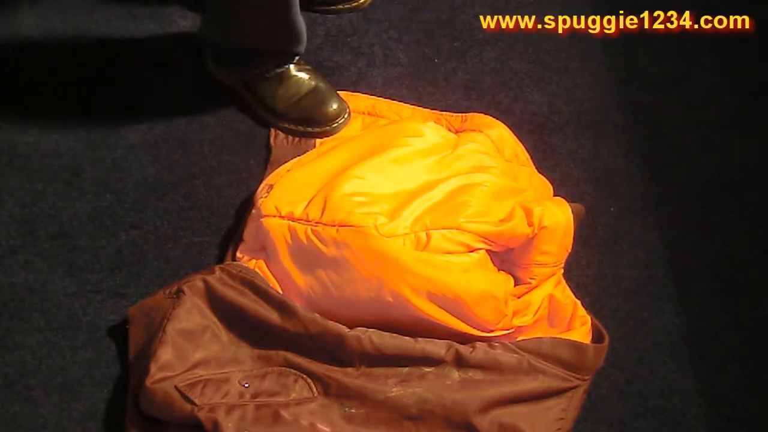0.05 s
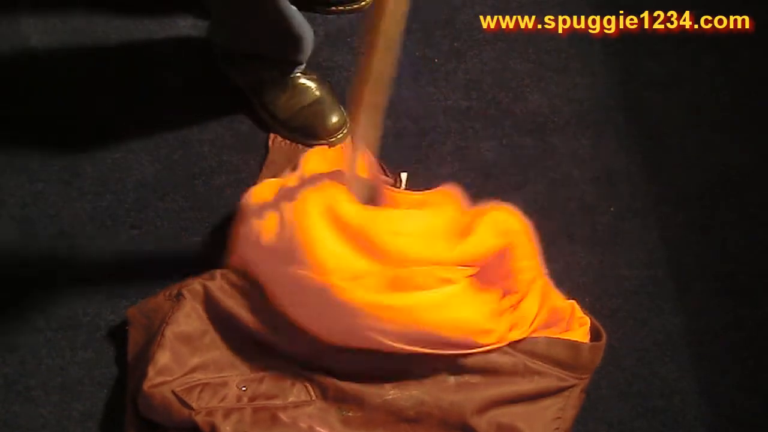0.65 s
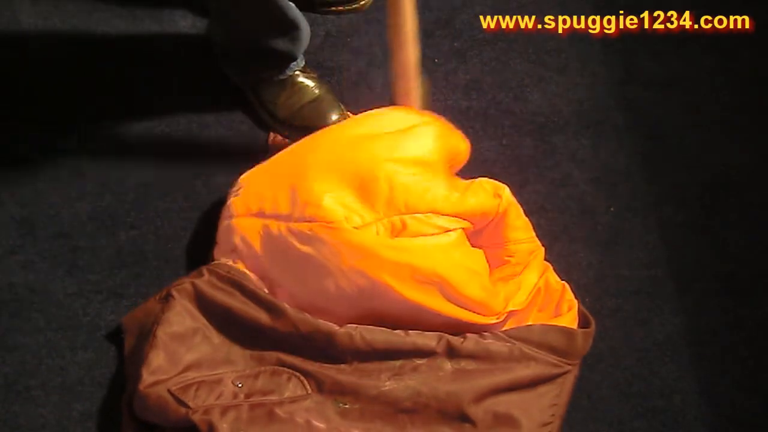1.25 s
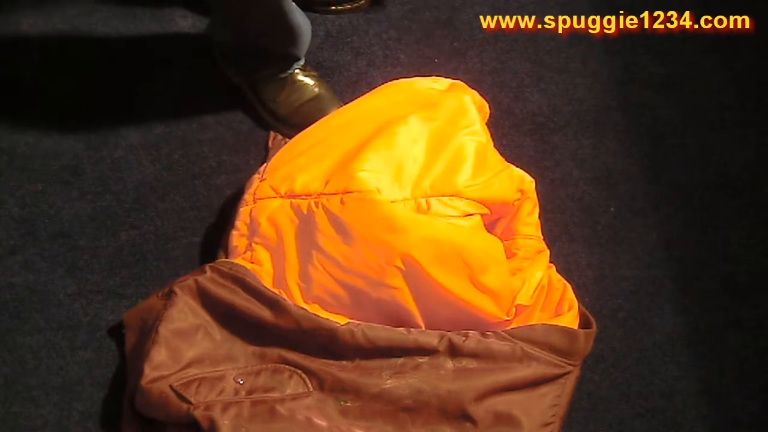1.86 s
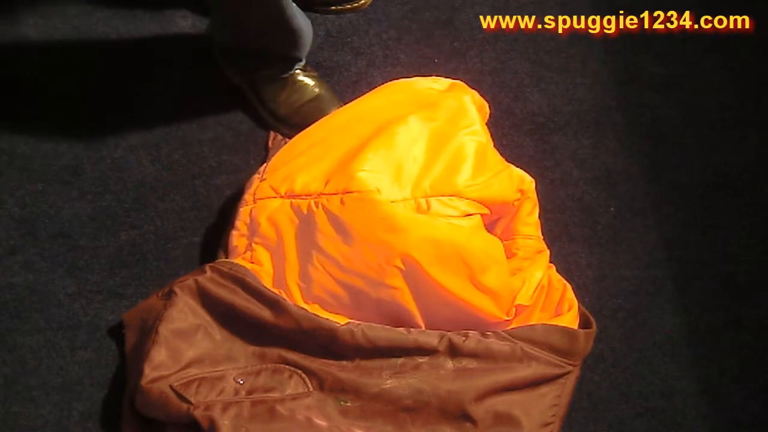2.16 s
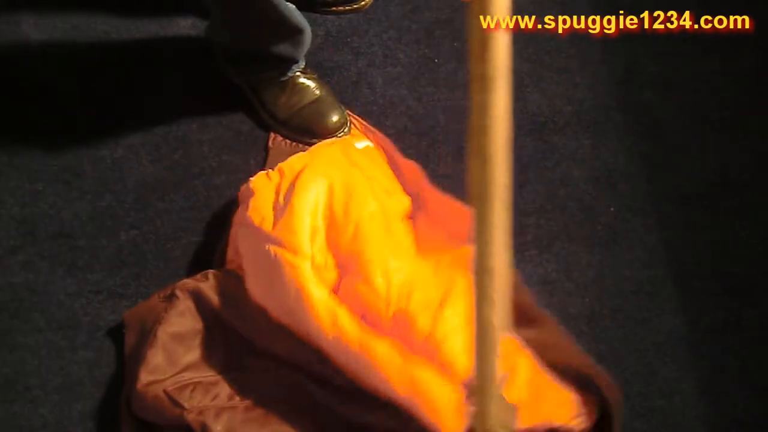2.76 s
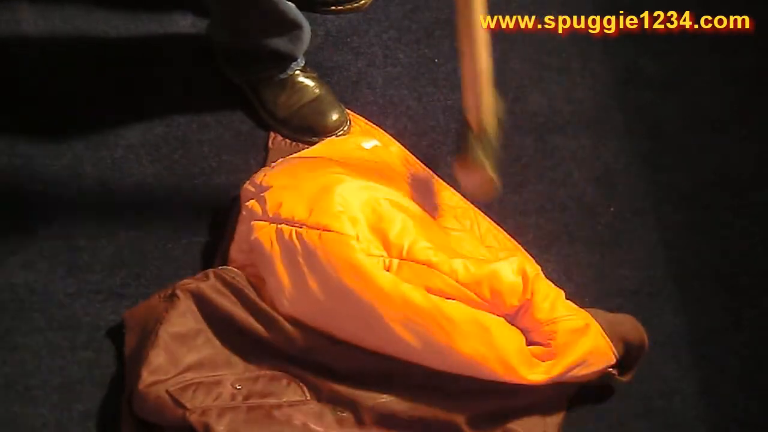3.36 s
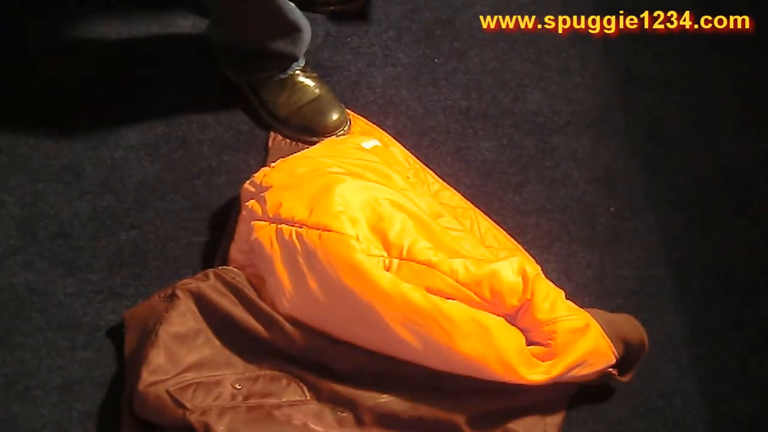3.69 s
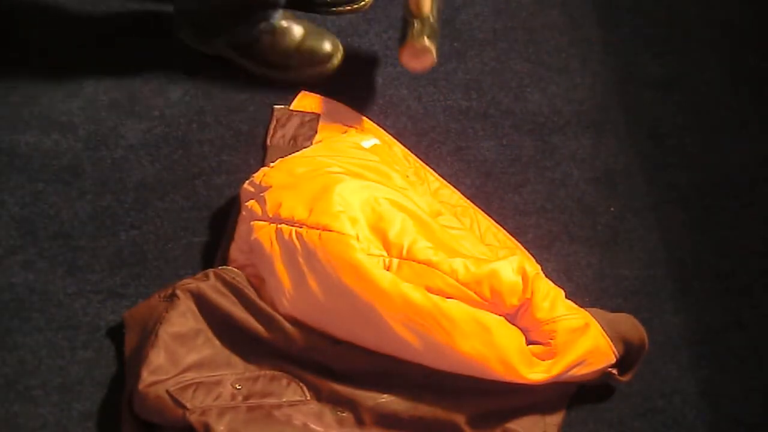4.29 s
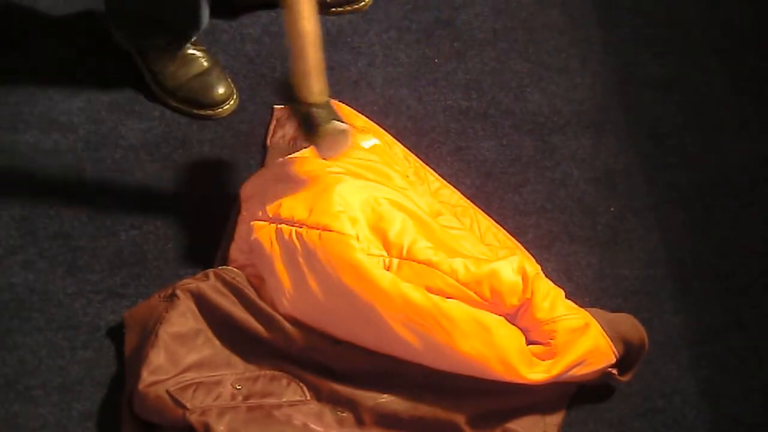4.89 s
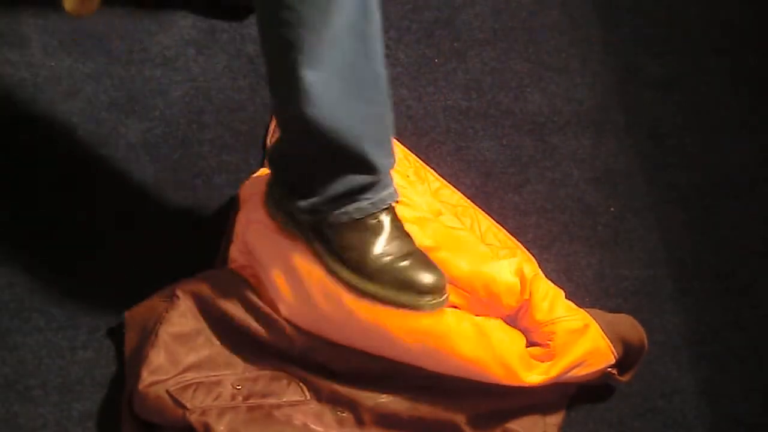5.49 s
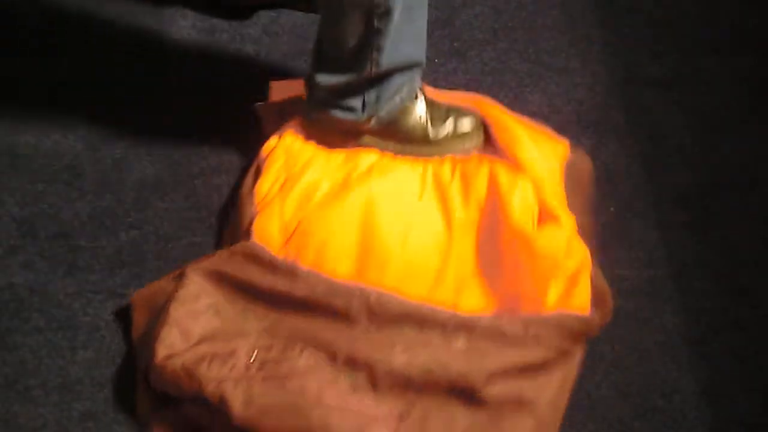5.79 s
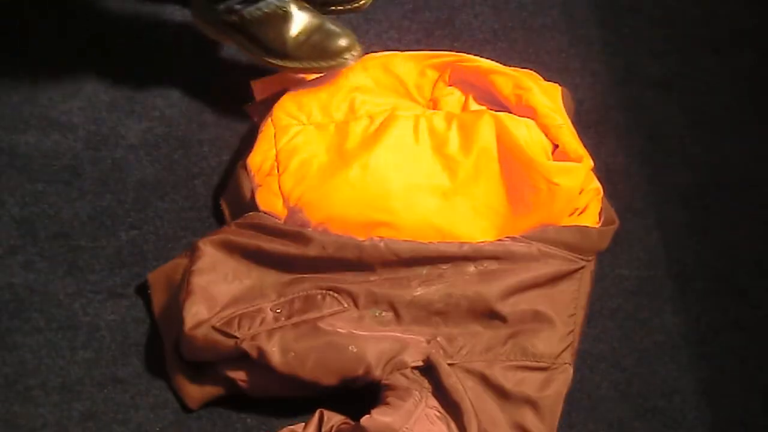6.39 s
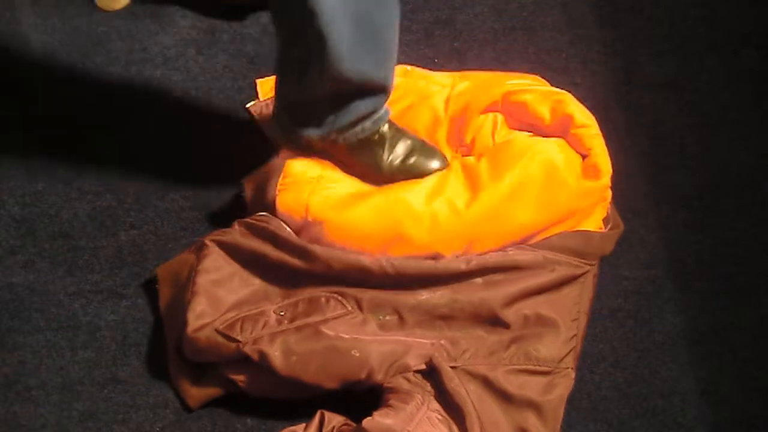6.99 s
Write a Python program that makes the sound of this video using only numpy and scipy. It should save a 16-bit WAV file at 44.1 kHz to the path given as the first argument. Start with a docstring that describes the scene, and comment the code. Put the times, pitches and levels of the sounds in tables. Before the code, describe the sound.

Steady hiss and a faint low drone fill a small carpeted room. At about 0.6 seconds, close to the microphone, a hammer pats into a padded nylon jacket, clacks on something hard and lands with a loud slap that briefly overloads the microphone. The cloth swishes over the carpet and the floor booms for half a second. Around 1.4 seconds come two faint zip tinks and a light rustle, then soft pats near 2 seconds. At 2.6 seconds a second, lighter blow clacks and slaps, dragging the cloth with a quick run of dull bumps. From about 4.1 seconds a boot shuffles, with a soft knock and a rustle, then a muffled thud near 4.8. The nylon rasps and hisses again around 5.8 seconds, where the rubber sole squeaks once. A last soft step and rustle come at about 7 seconds.

```python
"""Steady hiss and a faint low drone in a small, carpeted room. Close to the microphone, a long-handled
hammer is swung twice into a padded nylon jacket lying on the floor. Each swing pats the padding,
clacks on something hard, lands with a slap that sets the floor booming, and drags the cloth along;
the first overloads the microphone. Then a boot shuffles and pushes the jacket about: the weave rasps,
the lining hisses and the rubber sole squeaks once."""
import sys
import numpy as np
from scipy import signal
from scipy.fft import rfft, irfft, next_fast_len
from scipy.io import wavfile
from scipy.ndimage import uniform_filter1d

SR = 44100
rng = np.random.default_rng(int(sys.argv[2]) if len(sys.argv) > 2 else 0)


def inscribe(sig):
    """Save sig as 16-bit PCM at rate SR to the path in sys.argv[1].

    A 1-D sig is mono; a 2-D sig holds one channel per row.
    Samples are clipped to [-1, 1] before scaling.
    """
    pcm = np.round(np.clip(np.atleast_2d(sig).T, -1, 1) * 32767)
    wavfile.write(sys.argv[1], SR, pcm.astype(np.int16))


N = 319725
TIME = np.arange(N) / SR

# spectrum of the steady hiss: f/Hz, relative level/dB
HISS_COLOUR = [(12, -31), (20, 0.5), (95, 0), (148, -4.5), (185, -4.5), (333, -7), (362, -4), (393, -8.5),
               (465, -8), (505, -9.5), (985, -12), (1130, -12.5), (2540, -16.5), (4950, -22.5),
               (15500, -36)]
# low tones in the building: centre t/s, half length/s, f/Hz, level/dB, pitch sag half a length away/Hz
DRONES = [(1.359, .58, 63.8, -37.5, 10.5), (3.4, 1.36, 90.37, -45, 0), (4.098, 0.55, 37.5, -42.5, 0),
          (6.25, .45, 59.6, -44.5, 0), (6.4, 0.56, 88, -48, 0), (7.048, 0.21, 61, -42, 0)]
# the small room's echoes by band: f/Hz, t60/s, level/dB
ROOM_BANDS = [(80, 0.56, -4.5), (250, 0.58, -6), (785, 0.48, -4), (2450, 0.43, -5), (5440, 0.33, -7),
              (12000, 0.17, -22)]

# slow strokes of hammer or boot over the cloth:
# full speed t/s, attack/s, hold/s, release/s, level/dB, relative padding/dB, relative sheen/dB
RUBS = [(1.418, .25, .19, .13, -49, 0, -9), (4.27, .3, .09, .32, -38.3, -5, -15),
        (5.81, .42, .14, .36, -37, -2.5, -13.8), (6.97, .1, .04, 1.0, -46, 1, -15)]
# spectra of the rubbed weave, the padding and the lining's sheen: f/Hz, relative level/dB
WEAVE_COLOUR = [(250, -14), (600, 2), (1200, 0), (1700, 0), (2400, -1), (4000, -7.5), (6000, -15.5),
                (10000, -38)]
PADDING_COLOUR = [(50, -7), (110, 7.5), (160, -4), (240, 1), (500, 0.5), (900, -10), (3000, -43)]
SHEEN_COLOUR = [(2500, -17), (6500, -2), (9000, -6), (15000, -17)]
# folds of the lining slipping free: t/s, level/dB, release/s
SLIPS = [(1.515, -39, 0.051), (1.595, -42, .11), (4.275, -40.5, 0.046), (6.968, -45.5, .07)]
# the sole gripping nylon: f/Hz, relative level/dB, t60/s
SQUEAK_MODES = [(1170, 3.5, 0.17), (2380, -6, .12)]
# faint tinks of the zip pull: t/s, level/dB, f/Hz, t60/s
ZIP_TINKS = [(1.3672, -43.5, 8300, .06), (1.426, -49, 7250, .16)]
# cloth dragged by the swinging head: grip t/s, hold/s, level/dB, level change while pulled/(dB/s)
DRAGS = [(.66, 0.089, -25.5, 38), (2.595, .14, -30, -3)]
# spectrum of nylon skidding on carpet: f/Hz, relative level/dB
DRAG_COLOUR = [(50, 0), (80, 6.5), (150, 5), (350, 6.5), (500, 0), (700, 1.5), (1400, -4), (2600, -7.5),
               (5500, -12), (8000, -17.5), (15000, -27)]

# soft contacts of hammer or boot with padding and carpet: t/s, level/dB, low-pass f/Hz, pitch ratio
PATS = [(0.6025, -25.5, 2400, 0.97), (0.6376, -21.5, 700, 0.89), (1.8992, -27, 800, 0.93),
        (1.925, -32, 700, 0.94), (1.9923, -26.5, 750, 0.83), (2.5636, -28, 3600, 1.12),
        (2.568, -27.5, 3000, 1.3), (2.588, -18, 170, 0.51), (2.633, -22.5, 700, 1.2),
        (4.1296, -31.5, 500, 0.86), (4.766, -30, 260, 0.55), (6.9543, -30.5, 4000, 1.0)]
# spectrum of the noise in a soft contact: f/Hz, relative level/dB
PAT_COLOUR = [(40, -8), (85, 3), (150, -7), (300, 3), (650, 9), (3000, -16)]
# the heavily damped knock of carpet: f/Hz, relative level/dB, t60/s
KNOCK_MODES = [(221, -1, 0.032), (543, -1.5, 0.022), (750, -3, 0.018)]
# hard contacts of the head, as on a zip or stud: t/s, level/dB, pitch ratio, low-pass f/Hz
CLACKS = [(0.6378, -29, 0.74, 16000), (0.6505, -10.7, 1.0, 13000), (0.6548, -20.5, 0.94, 14000),
          (2.5886, -12.5, .93, 3500), (2.6072, -44, .93, 16000), (2.6112, -45, .93, 16000),
          (2.6323, -20.5, .93, 12000)]
# what the hard contacts ring with: f/Hz, relative level/dB, t60/s
CLACK_MODES = [(2070, -1.5, 0.073), (2500, -15, .06), (2830, -4, 0.06), (3160, -19, .045), (3520, -8, 0.04),
               (4270, -1, 0.034), (4670, -5, 0.046), (5880, -7.5, 0.058), (7950, -1.5, 0.022)]
# the floor under the carpet: f/Hz, relative level/dB, t60/s
FLOOR_MODES = [(60.9, -10, 0.53), (78.6, -4, 0.38), (112.5, -14.5, 0.34), (150.5, -15, 0.39),
               (178, -8, 0.41), (203, -10.5, 0.43), (194, 0, 0.089), (247, -12.5, 0.41), (272, -15, 0.29),
               (324, -20, 0.2), (628, -21.5, 0.61), (679, -23, 0.16), (707, -30, .35), (800, -27, 0.75),
               (954, -24, .3), (960, -17, 0.26), (1493, -23, 0.31), (2100, -22, .25), (2600, -11, 0.27)]
# the head landing through the cloth, two contacts a swing: t/s, slap level/dB, slap t60/s, floor level/dB
BLOWS = [(0.7101, -1, 0.05, -7.5), (0.7178, -9.5, 0.034, -32), (2.6282, -17, .022, -40),
         (2.6326, -19.5, 0.039, -32)]
# spectrum of cloth slapped flat: f/Hz, relative level/dB
SLAP_COLOUR = [(40, -13), (200, 3), (400, -10), (700, 7), (950, 0), (1250, -2), (2000, -3), (2700, -3),
               (3600, -7.5), (5000, -8.5), (7500, -16), (11000, -23), (15500, -35)]
# hollow thwack of head and wooden handle, deadened by the padding: f/Hz, relative level/dB, t60/s
HAMMER_MODES = [(860, 0, .024), (2850, -10, .015)]


def undb(db):
    """Decibels to gain."""
    return 10 ** (np.asarray(db) / 20)


def fade(t60):
    """One second of exponential decay."""
    return np.exp(-np.log(1000) * TIME[:SR] / t60)


def add(out, s, x):
    """Mix x into out from time s."""
    i = int(s * SR)
    out[i:i + len(x)] += x[:N - i]


def colour(x, points):
    """Filter x by a curve of (f/Hz, level/dB) points and scale it to rms 1."""
    hz, db = np.transpose(points)
    f = np.maximum(np.fft.rfftfreq(len(x), 1 / SR), 1)
    gain = undb(np.interp(np.log(f), np.log(hz), db))
    shaped = irfft(rfft(x) * gain, len(x))
    return shaped / np.sqrt(np.mean(shaped ** 2))


def soften(x, hz):
    """Low-pass: a softer contact holds less treble."""
    return signal.sosfilt(signal.butter(2, hz, fs=SR, output="sos"), x)


def ring(modes, ratio=1):
    """Struck modes; neighbours start in opposite directions."""
    return sum((-1) ** k * undb(db) * fade(t60) * np.sin(2 * np.pi * hz * ratio * TIME[:SR])
               for k, (hz, db, t60) in enumerate(modes))


def burst(t60, smooth_bins=120, cut_s=.7):
    """Decaying noise whose energy is spread evenly over frequency."""
    spectrum = rfft(rng.standard_normal(SR) * fade(t60))
    power = uniform_filter1d(np.abs(spectrum) ** 2, smooth_bins)
    return irfft(spectrum / np.sqrt(power), SR) * (TIME[:SR] < cut_s)


def contact(t60, points):
    """The noise of one impact: a coloured burst that starts near rms 1."""
    decay_rms = np.sqrt(np.mean(fade(t60) ** 2))
    return colour(burst(t60), points) * decay_rms * (TIME[:SR] < 2 * t60)


def threads(points, per_s, spread_db):
    """Threads catch and slip: a dense, coloured train of tiny clicks of uneven size."""
    count = next_fast_len(N)
    clicks = (rng.random(count) < per_s / SR) * rng.standard_normal(count)
    sizes = undb(spread_db * rng.standard_normal(count))
    return colour(clicks * sizes, points)[:N]


def stroke(s, attack_s, hold_s, release_s):
    """Gain of one movement: it rises until s, holds and dies away, 20 dB per attack or release time."""
    early, late = np.maximum(s - TIME, 0), np.maximum(TIME - s - hold_s, 0)
    return undb(np.maximum(-20 * (early / attack_s + late / release_s), -200))


def room_tone(hiss_db=-41, edge_db=-9.5, waver_db=1.0):
    """Steady hiss, and low tones in the building that swell, waver and fade."""
    out = undb(hiss_db) * colour(rng.standard_normal(next_fast_len(N)), HISS_COLOUR)[:N]
    for s, half_s, hz, db, sag_hz in DRONES:
        away = ((TIME - s) / half_s) ** 2  # 1 at half a length from the centre
        waver = np.interp(TIME, np.linspace(0, N / SR, 40), rng.standard_normal(40))
        pitch_hz = hz - sag_hz * np.minimum(away, 2)
        tone = np.sqrt(2) * np.sin(2 * np.pi * np.cumsum(pitch_hz) / SR)
        out += tone * undb(db + edge_db * away + waver_db * waver)
    return out


def room_echoes(x, build_s=0.0055):
    """Diffuse echoes off the nearby walls build up within milliseconds; the treble dies first."""
    hz, t60, db = np.transpose(ROOM_BANDS)
    log_f = np.log(np.maximum(np.fft.rfftfreq(SR, 1 / SR), 1))
    tail = 0
    for share, band_t60, band_db in zip(np.eye(len(hz)), t60, db):
        echoes = burst(band_t60) * (1 - np.exp(-TIME[:SR] / build_s))
        echoes /= np.linalg.norm(echoes)
        band = np.sqrt(np.interp(log_f, np.log(hz), share))
        tail += undb(band_db) * irfft(rfft(echoes) * band, SR)
    return signal.fftconvolve(x, tail[:SR // 2])[:N]


def cloth_rubs(catch_db=1.2, catch_hz=45, padding_power=1.4, sheen_power=.75):
    """Slow strokes: the weave rasps, the padding murmurs, the lining hisses; folds catch and let go."""
    weave = threads(WEAVE_COLOUR, per_s=7000, spread_db=1.5)
    padding = threads(PADDING_COLOUR, per_s=2300, spread_db=0)
    sheen = threads(SHEEN_COLOUR, per_s=5000, spread_db=1.5)
    folds = np.interp(TIME * catch_hz, np.arange(SR), rng.standard_normal(SR))
    out = np.zeros(N)
    for s, attack_s, hold_s, release_s, db, padding_db, sheen_db in RUBS:
        force = stroke(s, attack_s, hold_s, release_s)
        murmur = undb(padding_db) * force ** padding_power * padding  # needs weight
        hiss = undb(sheen_db) * force ** sheen_power * sheen  # sounds at a light touch
        out += undb(db) * (force * weave + murmur + hiss)
    return out * undb(catch_db * folds)


def fold_slips(attack_s=.02, sheen_db=-5.5):
    """A fold lets go at once and slides to rest with a brief, bright rustle."""
    weave = threads(WEAVE_COLOUR, per_s=5000, spread_db=3.5)
    sheen = threads(SHEEN_COLOUR, per_s=3000, spread_db=2)
    slide = sum(undb(db) * stroke(s, attack_s, 0, release_s) for s, db, release_s in SLIPS)
    return slide * (weave + undb(sheen_db) * sheen)


def sole_squeak(s=5.815, gain_db=-33.5, build_s=0.011):
    """Rubber sticks and slips on nylon: a short tone that builds and dies."""
    out = np.zeros(N)
    onset = 1 - np.exp(-TIME[:SR] / build_s)
    add(out, s, undb(gain_db) * ring(SQUEAK_MODES) * onset)
    return out


def zip_tinks(pair_ratio=1.025):
    """A small metal tab rings with a close pair of modes."""
    out = np.zeros(N)
    for s, db, hz, t60 in ZIP_TINKS:
        add(out, s, ring([(hz, db, t60), (hz * pair_ratio, db - 4, t60 / 2)]))
    return out


def cloth_drags(attack_s=0.054, release_s=0.07):
    """Nylon skids fast over the carpet for as long as the hammer head pulls it."""
    pull = np.zeros(N)
    for s, hold_s, db, db_per_s in DRAGS:
        pulled_s = np.clip(TIME - s, 0, hold_s)
        pull += stroke(s, attack_s, hold_s, release_s) * undb(db + db_per_s * pulled_s)
    return threads(DRAG_COLOUR, per_s=6000, spread_db=1.5) * pull


def knock(bright_hz, ratio, noise_db=-0.5, noise_t60=.055):
    """A light contact gives a dead knock, higher where the padding is pressed thin."""
    noise = undb(noise_db) * contact(noise_t60, PAT_COLOUR)
    return soften(noise + ring(KNOCK_MODES, ratio), bright_hz)


def head_skips(start_s=2.648, first_gap_s=.0105, gap_growth=1.47, gain_db=-17.5, loss_db=0.9):
    """After the second blow the dragged head bumps over five folds, ever slower and softer."""
    out, s = np.zeros(N), start_s
    for k in range(5):
        add(out, s, undb(gain_db - k * loss_db) * knock(bright_hz=475, ratio=1.49))
        s += first_gap_s * gap_growth ** k
    return out


def soft_pats():
    """Hammer and boot touch down on padding and carpet."""
    out = np.zeros(N)
    for s, db, bright_hz, ratio in PATS:
        add(out, s, undb(db) * knock(bright_hz, ratio))
    return out


def hard_clacks(crack_t60=0.038, ring_db=-8):
    """The head meets something hard: a short crack and a few quickly damped modes."""
    out = np.zeros(N)
    for s, db, ratio, bright_hz in CLACKS:
        crack = contact(crack_t60, [(800, -7.5), (1800, 1), (5000, 3.5), (8500, -3.5), (15000, -20)])
        ringing = undb(ring_db) * ring(CLACK_MODES, ratio)
        add(out, s, undb(db) * soften(crack + ringing, bright_hz))
    return out


def floor_boom():
    """Every blow rings the same floor through the carpet."""
    out, boom = np.zeros(N), ring(FLOOR_MODES)
    for s, _, _, floor_db in BLOWS:
        add(out, s, undb(floor_db) * boom)
    return out


def hammer_blows():
    """Cloth slaps flat under the head, and the hammer rings briefly."""
    out, thwack = np.zeros(N), ring(HAMMER_MODES)
    for s, slap_db, t60, _ in BLOWS:
        add(out, s, undb(slap_db) * (contact(t60, SLAP_COLOUR) + thwack))
    return out


def scene():
    """One microphone hears the contacts close up and off the walls; the boom fills the room by itself."""
    impacts = hammer_blows() + hard_clacks() + soft_pats() + head_skips() + zip_tinks()
    near = impacts + cloth_drags() + cloth_rubs() + fold_slips() + sole_squeak()
    return (near + room_echoes(near) + floor_boom() + room_tone())[None]


def record(dry, top_hz=15650):
    """The microphone overloads on the hardest blow; the highest treble is cut steeply."""
    clipped = np.clip(dry, -1, 1)
    return signal.sosfilt(signal.ellip(10, .2, 70, top_hz, fs=SR, output="sos"), clipped)


dry = scene()
out = record(dry)
inscribe(out)
```